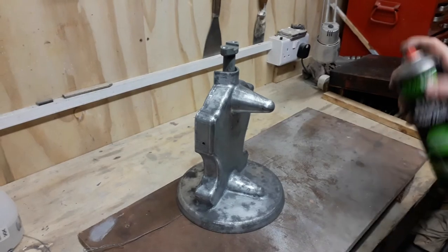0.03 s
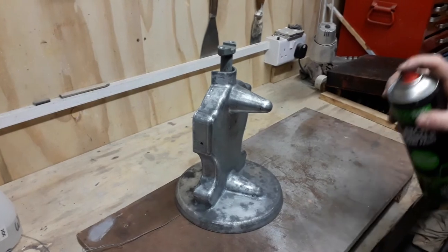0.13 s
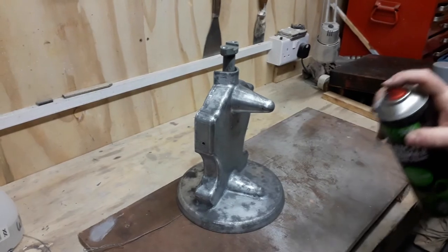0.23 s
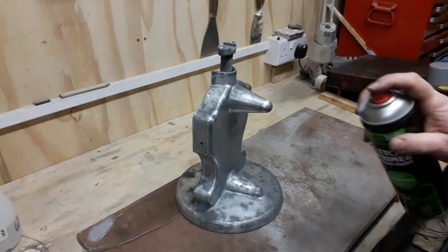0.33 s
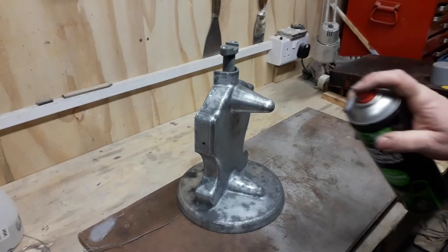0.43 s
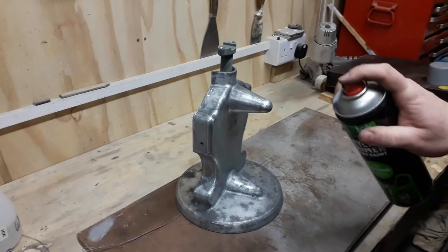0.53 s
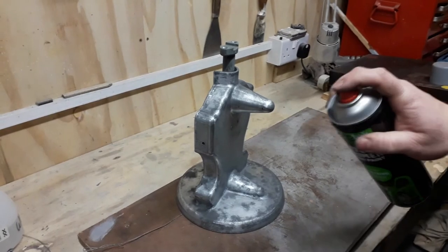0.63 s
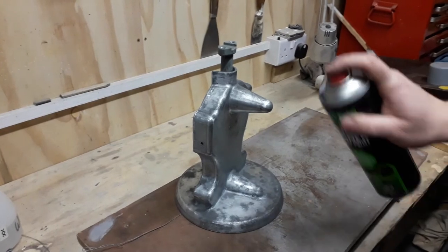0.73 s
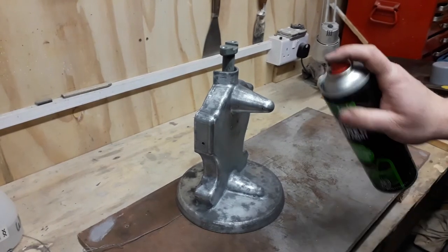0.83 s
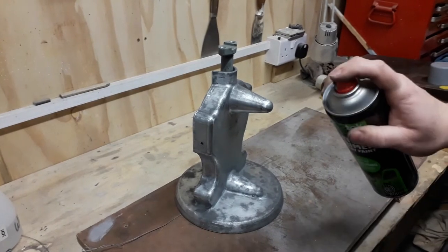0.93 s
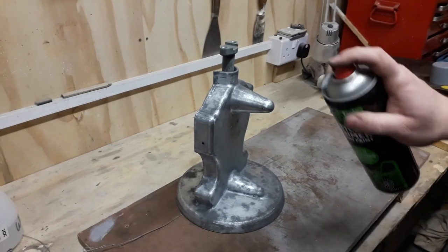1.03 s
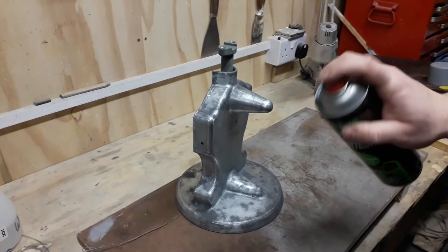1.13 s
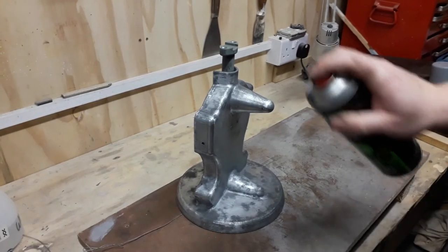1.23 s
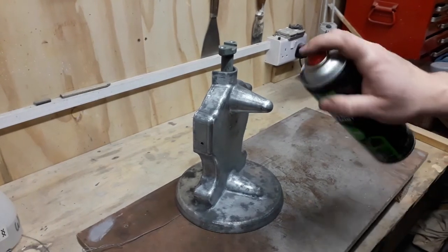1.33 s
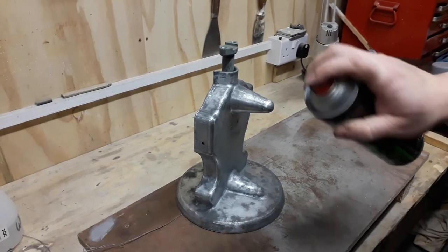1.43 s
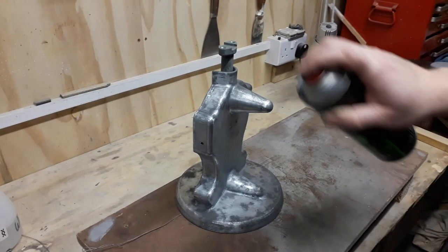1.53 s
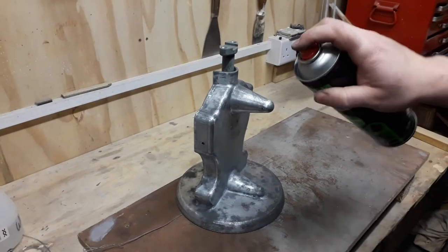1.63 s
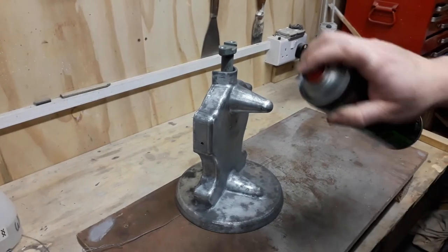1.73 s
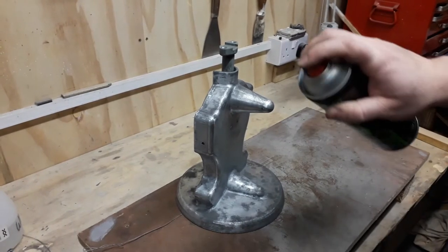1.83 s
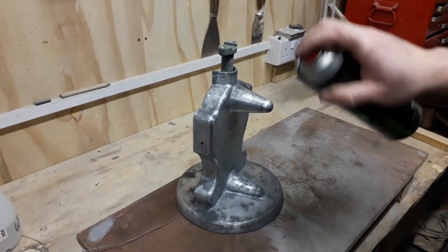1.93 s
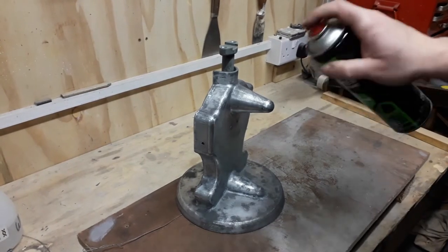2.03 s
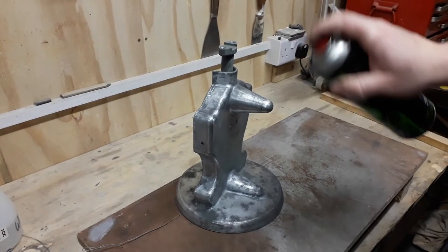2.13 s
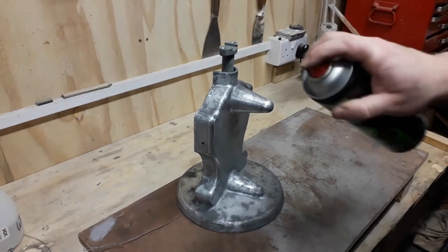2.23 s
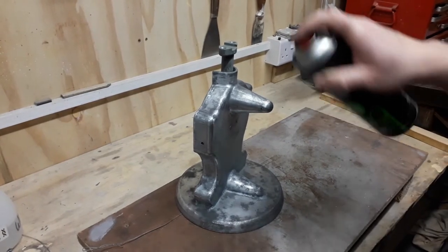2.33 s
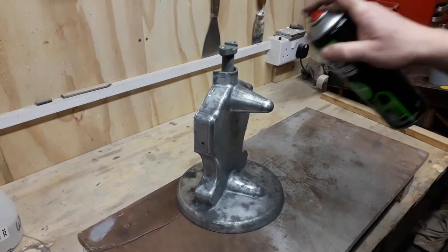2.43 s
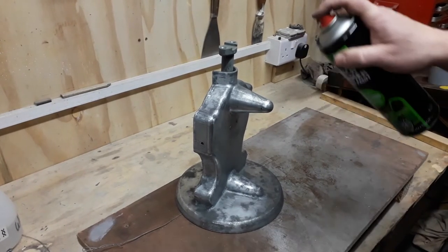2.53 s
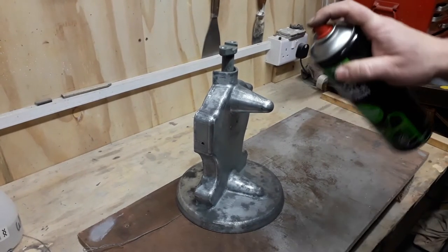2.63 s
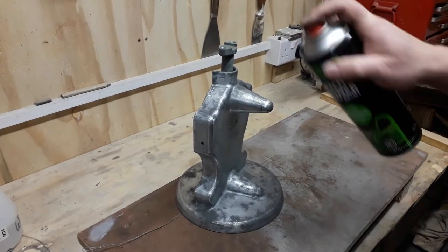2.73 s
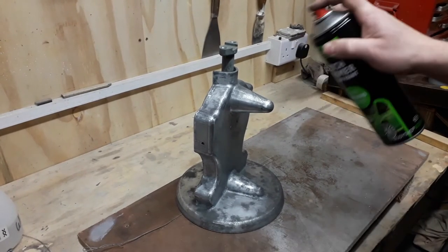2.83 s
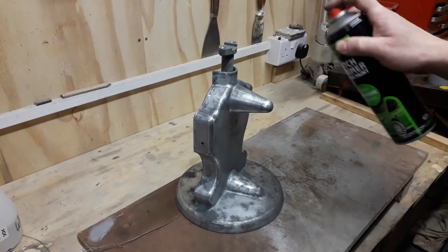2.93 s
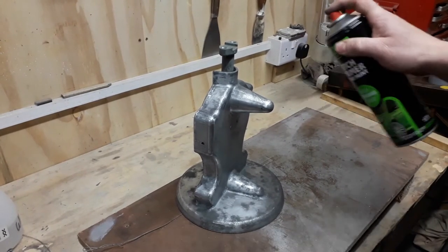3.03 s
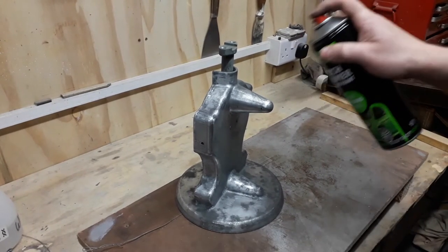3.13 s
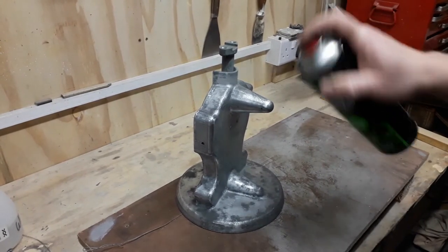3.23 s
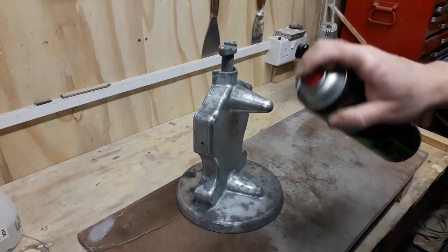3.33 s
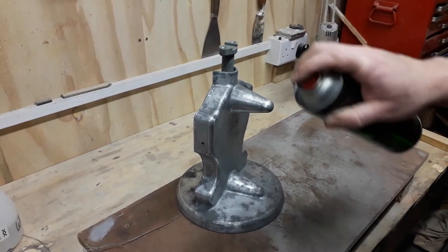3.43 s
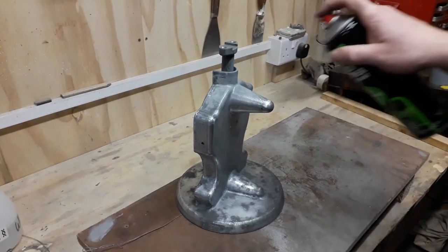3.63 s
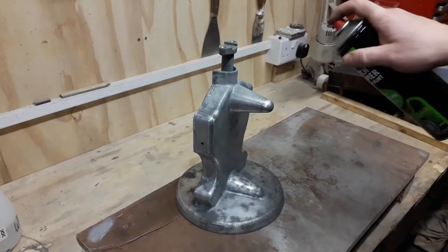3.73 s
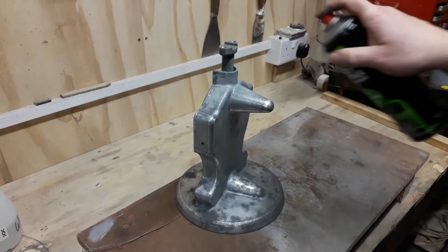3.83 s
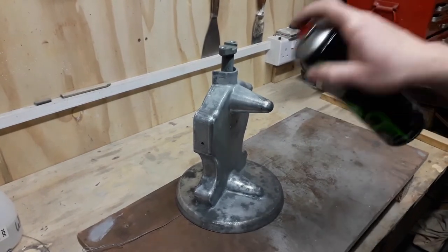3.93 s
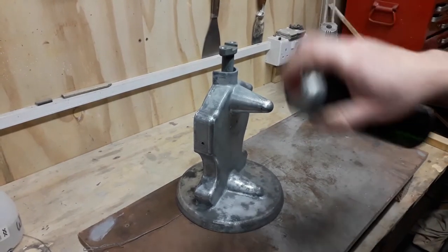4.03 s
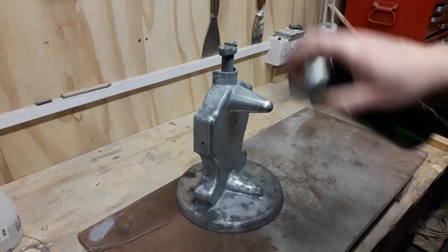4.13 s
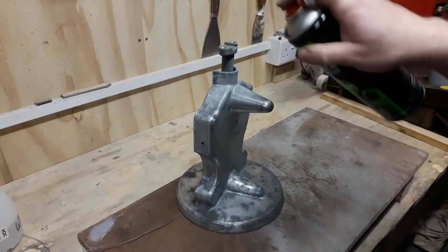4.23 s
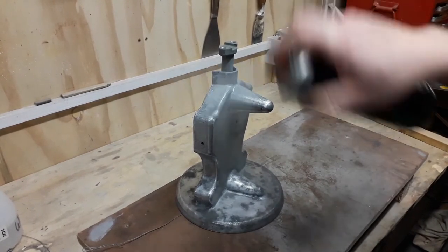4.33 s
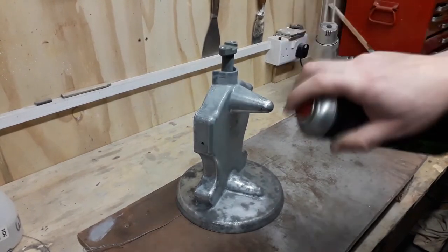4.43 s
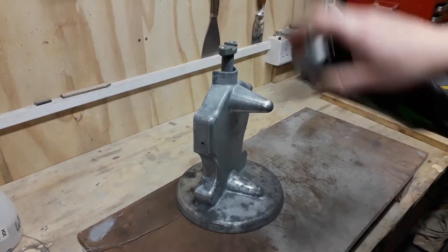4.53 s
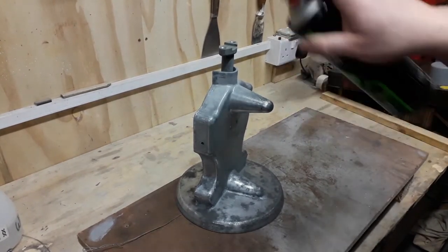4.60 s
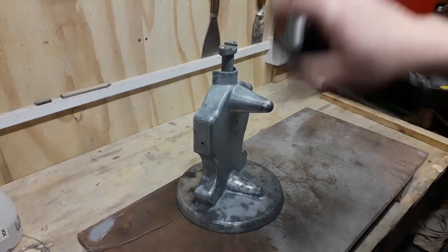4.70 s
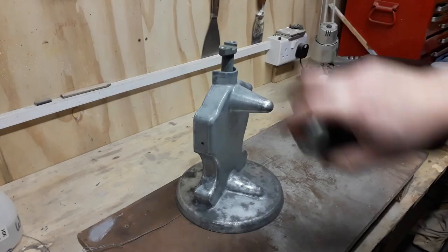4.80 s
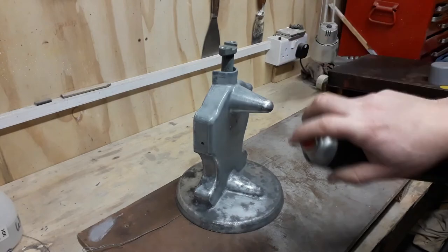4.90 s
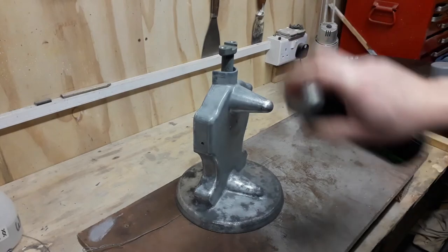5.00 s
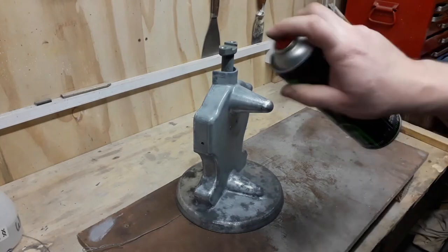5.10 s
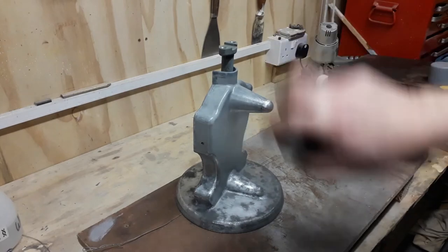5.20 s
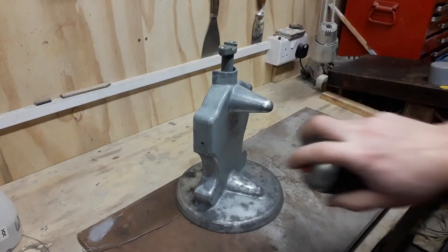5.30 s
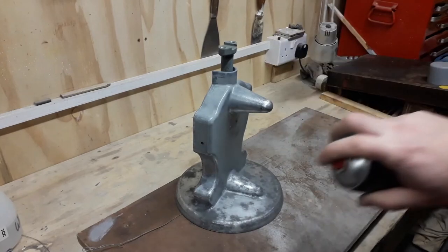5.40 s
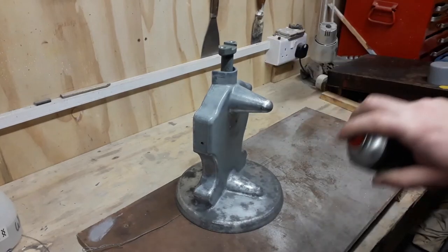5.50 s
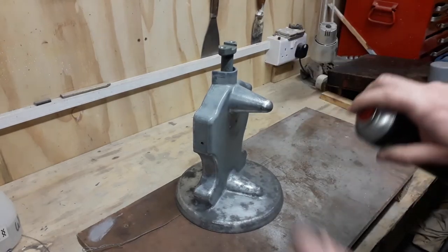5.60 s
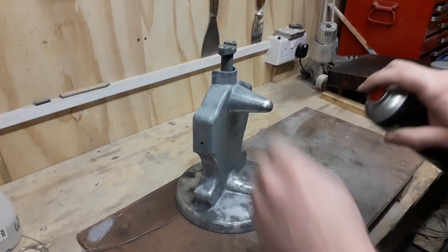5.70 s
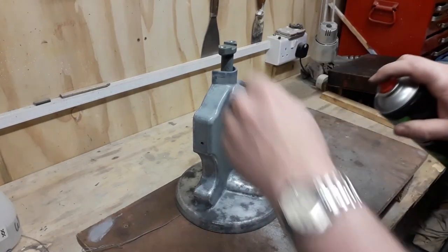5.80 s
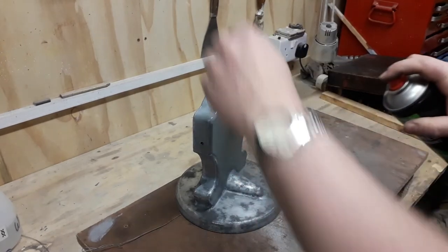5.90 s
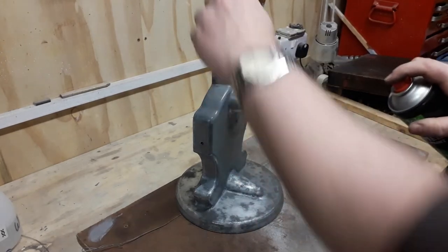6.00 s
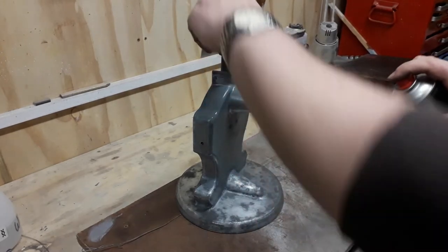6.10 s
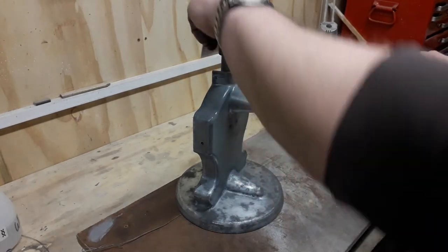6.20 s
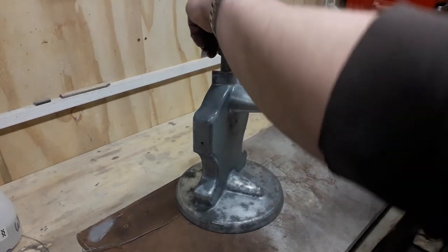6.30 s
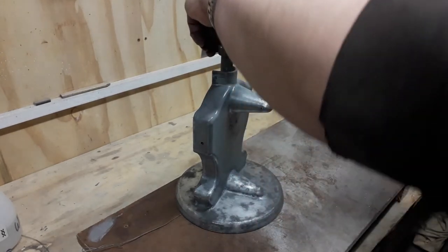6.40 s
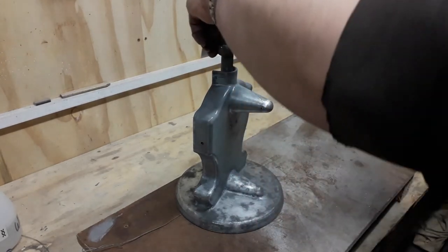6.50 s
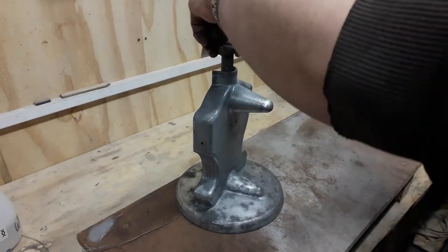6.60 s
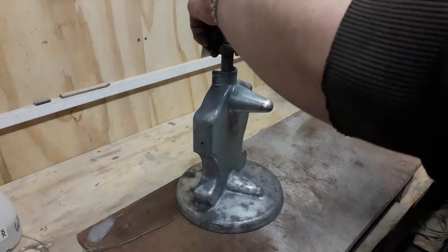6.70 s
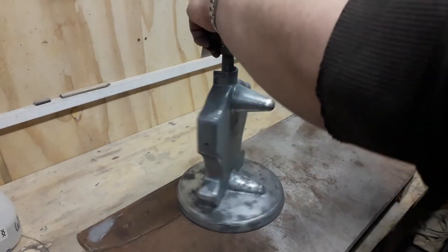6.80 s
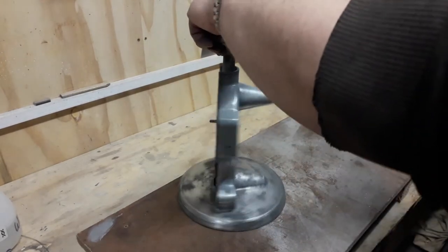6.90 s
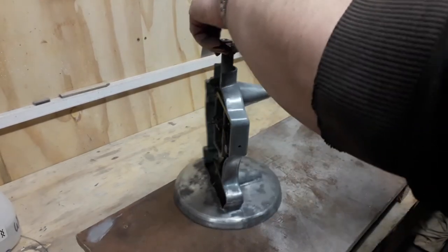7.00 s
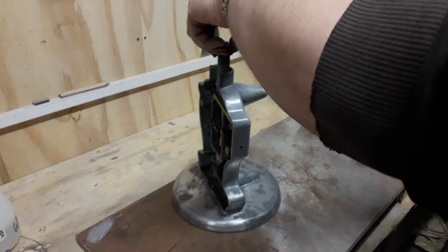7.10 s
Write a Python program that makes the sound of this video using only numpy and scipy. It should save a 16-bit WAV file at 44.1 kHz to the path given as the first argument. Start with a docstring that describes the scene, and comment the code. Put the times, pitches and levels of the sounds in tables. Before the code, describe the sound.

In a small wooden workshop, close to the microphone, a spray can is shaken with a few hard, bright ball clacks. After a near-quiet pause, eight short, crisp bursts of spray hiss out, with ball rattles between and after them, over a soft hiss and low rush. Finally a hand knocks a heavy iron casting and turns it with a gritty scrape on a steel plate.

```python
"""An aerosol can sprays a small iron casting on a workbench in eight short bursts: filtered noise for jet,
splash, gust. A hand taps the can; shaken before and around the bursts, its mixing ball strikes and rolls: noisy
contacts exciting wall and body resonances. A soft hiss and a low rush, both slowly varying noise, swell and dip
over a steady rumble. Then a hand knocks the casting and turns it, scraping, on its steel plate: noise and tiny
slips through iron modes. Small wooden room, close microphone."""
import sys
import numpy as np
from scipy import signal
from scipy.fft import rfft, irfft
from scipy.io import wavfile
from scipy.ndimage import map_coordinates

SR = 44100
rng = np.random.default_rng(int(sys.argv[2]) if len(sys.argv) > 2 else 0)


def store_wav(level_fs):
    """Save 16-bit WAV to argv[1]."""
    pcm = np.round(np.clip(np.atleast_2d(level_fs), -1, 1) * 32767)
    wavfile.write(sys.argv[1], SR, pcm.T.astype(np.int16))


N = 315315
T = np.arange(N) / SR
TAIL = T[:SR // 2]

# soft hiss and low rush: (time [s], hiss level [dB], rush level [dB])
AIR_LEVELS = [(0, -65.5, -76), (.28, -70.5, -65), (.72, -82, -95), (.95, -86.5, -82.5), (1.12, -69, -81),
              (1.5, -60.5, -72), (2.1, -58, -67), (2.65, -65, -63.5), (3.4, -61.5, -73), (3.75, -56.5, -63),
              (4.2, -49.5, -56.5), (4.65, -52, -61.5), (5.5, -56, -63.5), (5.85, -63, -73),
              (6.25, -67.5, -78.5), (6.65, -78.5, -66)]
# brief dips of hiss and rush: (time [s], depth [dB], half length [s])
AIR_DIPS = [(3.078, 21, 0.037), (3.466, 7, 0.025), (5.017, 17, 0.095)]
# colours of hiss, rush and room rumble: (frequency [Hz], gain [dB])
HISS_COLOUR = [(700, -20), (1400, -17.5), (2300, -12), (3500, -10), (4100, -1), (4600, 2), (5600, -4.5),
               (6900, -1), (8300, -19), (9500, -25), (12500, -16.5), (16000, -18.5)]
RUSH_COLOUR = [(60, -20), (150, -10.5), (280, -3.5), (410, -2), (650, -9), (1000, -13), (2000, -28)]
RUMBLE_COLOUR = [(20, -15.5), (45, -11), (75, -0.5), (110, -4), (200, -19), (600, -30.5), (3000, -33)]
RUMBLE_DB = -76

# ball strikes the can; the first row is a light tap of the hand on the can, sounded the same way: # (time [s],
# clack level [dB], hollow body re clack [dB], wall resonance nearest the spot [Hz])
BALL_BLOWS = [(0.0347, -39.5, -14.5, 3200), (0.0467, -37.5, -5, 4360), (0.1443, -45, 3, 4000),
              (0.1943, -17.5, -14, 4370), (0.3032, -31, -8.5, 4560), (0.335, -30, -8, 6000),
              (0.3838, -38.5, -2.5, 4470), (0.4557, -33, -8.5, 4940), (0.4994, -42.5, -11, 4500),
              (0.532, -38, -10.5, 4570), (0.5858, -41.5, -10.5, 5130), (1.865, -51.5, -14, 4300),
              (2.4639, -15, -19, 5340), (2.5419, -35.5, -19, 6800), (2.585, -44, -9, 3500),
              (2.6003, -28, -12.5, 7000), (2.611, -29.5, -9, 6150), (2.659, -40.5, -2, 4200),
              (2.8745, -21, -11, 4200), (2.9223, -39.5, 6, 4600), (2.9401, -30, -15, 4080),
              (2.9728, -26.5, -12, 4100), (3.0076, -33.5, -7.5, 4000), (3.8851, -38, -13.5, 4200),
              (4.127, -23, -6.5, 4260), (4.174, -31.5, -5, 6600), (4.234, -31, -11.5, 3840),
              (4.2737, -33.5, 1, 4100), (4.43, -39.5, 2.5, 4200), (4.8621, -24, -6, 5800),
              (4.891, -34.5, -8, 4070), (4.9164, -29, -9, 4200), (4.942, -33.5, -10, 4330),
              (5.297, -31, 1.5, 7000), (5.313, -17, -9, 4200), (5.3561, -35, -0.5, 6000),
              (5.3948, -38.5, 2.5, 4540), (5.4258, -46.5, 3.5, 3900), (5.5491, -26, -11, 5870),
              (5.595, -40, -2.5, 4100), (5.6348, -44.5, 0.5, 4430), (5.659, -49.5, 3, 6400),
              (5.6786, -35, -9, 4600), (5.7175, -43, -5.5, 4300)]
# modes of the can's wall: (frequency [Hz], level [dB], t60 [s])
CAN_MODES = [(1500, -14, .04), (2110, -1.5, 0.033), (2340, -9, 0.085), (4145, -9.5, 0.12), (4690, -11, .11),
             (4260, -3.5, .08), (5670, -19.5, .09), (5480, -16.5, 0.035), (6360, -2, 0.048),
             (6980, -17.5, .07)]
# colours of the ball's contact, hollow body and hard tick: (frequency [Hz], gain [dB])
CLACK_COLOUR = [(1800, -19.5), (3000, -10), (4100, 4), (5200, -1), (6300, 1), (7300, -6), (8200, -22),
                (11000, -40)]
HOLLOW_COLOUR = [(400, -14), (1000, -7), (1600, 1.5), (2300, 3), (3000, -6.5), (4500, -34), (9000, -49.5)]
TICK_COLOUR = [(5000, -30), (8000, -9), (11000, 1.5), (16000, -6.5)]
# after-ring and tick re clack; a blow that shakes the body gives more of both [dB per dB of body]
RING_DB, RING_DB_PER_BODY_DB = -9, 0.12
TICK_DB, TICK_DB_PER_BODY_DB = -16, 0.3
# ball rolls along the wall:
# (time [s], rub level [dB], hollow body level [dB], wall resonance [Hz], half length [s])
BALL_ROLLS = [(0.15, -57, -66, 3230, .07), (0.85, -81, -92, 3300, .04), (2.653, -57, -61, 3400, .08),
              (3.41, -74, -63, 3500, .05), (5.5, -55, -56, 4300, .07), (5.85, -76, -70, 4300, .12)]

# nozzle presses: (time [s], held [s], valve opening time constant [s], jet level [dB], splash level [dB],
# gust level [dB], time the jet is square on the casting [s], dwell there [s])
NOZZLE_PRESSES = [(1.897, 0.13, 0.013, -30, -46.5, -39, 2.012, .024),
                  (2.258, 0.16, .006, -30.5, -45, -42.5, 2.383, 0.019),
                  (2.7, 0.15, 0.0072, -30, -42.5, -44.5, 2.83, 0.023),
                  (3.106, 0.16, 0.037, -24, -35, -44, 3.232, 0.059),
                  (3.502, 0.14, 0.0098, -25.5, -41, -49.5, 3.58, 0.12),
                  (4.269, .122, 0.011, -26, -35, -49.5, 4.32, 0.037),
                  (4.702, 0.096, 0.0086, -26.5, -34.5, -49, 4.765, 0.059),
                  (5.147, 0.11, 0.015, -26, -37.5, -47.5, 5.19, 0.022)]
# colours of jet, splash and gust: (frequency [Hz], gain [dB])
JET_COLOUR = [(1500, -36), (2400, -7.5), (3000, -11.5), (3900, -6), (4900, -6), (6200, -0.5), (7300, 1),
              (8400, -11.5), (9500, -13.5), (11000, -5), (13000, -3), (14200, -5), (16000, -6.5)]
SPLASH_COLOUR = [(400, -22.5), (900, -13), (1400, -5), (2000, -3), (2450, -1), (3000, -7.5), (4500, -0.5),
                 (7000, -25.5)]
GUST_COLOUR = [(50, -30.5), (120, -13), (220, -2), (330, -4), (550, -2), (800, -13), (1300, -18),
               (5000, -48.5)]
JET_SHUT_S, SPLASH_SHUT_S = 0.012, 0.016  # time constants once the valve is let go
SWEEP_DB = 2.5  # jet loss at the ends of a sweep re its middle
GUST_SPILL = 0.11  # share of the gust left while the jet points past the casting
SPLASH_AIM_DWELLS = 2.9  # dwells either side of the square hit where the splash is 3 dB down

# casting knocks on the plate: (time [s], thud level [dB], clink level [dB], clink pitch [Hz])
PLATE_KNOCKS = [(6.288, -35, -39, 3170), (6.528, -45, -50.5, 480), (6.635, -55.5, -71, 2840),
                (6.716, -29.5, -38.5, 1200), (6.742, -38, -67, 700), (6.878, -41.5, -54, 1890),
                (6.926, -29.5, -31.5, 2480), (6.977, -35.5, -38, 2165), (7.012, -41.5, -34, 5950),
                (7.038, -53, -38, 4900), (7.085, -34.5, -53, 1480)]
# modes of casting and plate together: (frequency [Hz], width [Hz], gain [dB])
IRON_MODES = [(111, 33, 1), (158, 25, 1), (212, 28, 10), (399, 29, 6), (444, 19, -3), (507.5, 14, -1),
              (580, 14, 2.5), (645.4, 19, 11.5), (794, 32, 0), (906, 14, 2), (962, 16, 4.5),
              (1467, 40, 2.5), (1535, 30, 3), (2192, 29, 6), (2500, 42, 2), (3110, 70, 6), (3840, 55, 8),
              (4200, 30, 12.5), (5080, 50, 8.5), (5666, 65, 12.5), (6440, 45, 8.5), (7540, 32, 0)]
# colours of plate thud, bench boom, knock clink and gritty scrape: (frequency [Hz], gain [dB])
THUD_COLOUR = [(330, -7.5), (430, 1), (650, -3), (950, -4), (1500, -20), (2500, -53), (8000, -81)]
BOOM_COLOUR = [(55, -6), (110, -2.5), (170, -2.5), (230, -5.5), (310, -6), (600, -23.5), (3000, -52)]
CLINK_COLOUR = [(900, -0.5), (1500, 2.5), (3100, 1.5), (4500, -5.5), (7400, -3), (8800, -21.5),
                (16000, -20)]
GRIT_COLOUR = [(700, -13), (1500, 4.5), (2400, 0), (3200, -2.5), (4800, -1.5), (6300, -5), (7600, -5.5),
               (9000, -23), (11500, -14), (16000, -23)]

# casting is turned: (time [s], effort as grinding level [dB])
TURN_EFFORT = [(6.775, -49.5), (6.83, -42.5), (6.87, -43.5), (6.93, -35.5), (6.995, -33.5), (7.04, -43.5),
               (7.105, -39), (7.15, -51)]
# iron squeals: (time [s], mean pitch [Hz], median level [dB], half length [s])
IRON_SQUEALS = [(6.832, 7540, -44, .022), (6.822, 5800, -47, .027), (7.115, 5820, -47, .015)]
GRIT_DB = 0.5  # gritty treble re grinding
SLIPS_PER_S, CRACKS_PER_S = 1600, 90  # of the base on the plate, and of grit under it
STICK_DB, STICK_PER_S = 0.5, 90  # unevenness of sticking and letting go

TOP_HZ = 15850


def undb(db):
    """Decibels to gain."""
    return 10 ** (np.asarray(db) / 20)


def unit(x, span_s=None):
    """Scale to rms 1, over the whole sound or its first span_s."""
    end = int(span_s * SR) if span_s else None
    return x / np.sqrt(np.mean(x[:end] ** 2) + 1e-20)


def colour(x, points, size=4096):
    """Minimum-phase filter through (Hz, dB) points; 12 dB/octave down below the first, to at most 40 dB."""
    hz, db = np.transpose(points)
    freqs_hz = np.maximum(np.fft.rfftfreq(size, 1 / SR), 1)
    low_cut = np.clip(freqs_hz / hz[0], 0.1, 1) ** 2
    gain = undb(np.interp(np.log(freqs_hz), np.log(hz), db)) * low_cut
    # folding the cepstrum makes the response causal
    cepstrum = irfft(np.log(gain))
    cepstrum[1:size // 2] *= 2
    cepstrum[size // 2 + 1:] = 0
    impulse = irfft(np.exp(rfft(cepstrum)))
    return signal.fftconvolve(x, impulse)[:len(x)]


def noise(points):
    """Coloured noise of rms 1."""
    return unit(colour(rng.standard_normal(N), points))


def tail_noise():
    """White noise as long as TAIL."""
    return rng.standard_normal(len(TAIL))


def fade(t60_s):
    """Exponential decay, 60 dB in t60_s."""
    return np.exp(-np.log(1000) * TAIL / t60_s)


def onset(rise_s):
    """Exponential approach to 1."""
    return 1 - np.exp(-TAIL / rise_s)


def swell(s, half_length_s):
    """Bell-shaped rise and fall around time s."""
    return np.exp(-((T - s) / half_length_s) ** 2)


def walk(rate_hz):
    """Random wander: straight lines between normal draws at rate_hz."""
    knots_s = np.arange(0, N / SR + 1, 1 / rate_hz)
    return np.interp(T, knots_s, rng.standard_normal(len(knots_s)))


def gains(rows, rise_s=0.002, fall_s=0.024):
    """Columns of dB as gain curves that die away outside their span."""
    s, *columns = np.transpose(rows)
    before_s = np.maximum(s[0] - T, 0)
    after_s = np.maximum(T - s[-1], 0)
    gate = np.exp(-before_s / rise_s - after_s / fall_s)
    return [gate * undb(np.interp(T, s, column)) for column in columns]


def resonate(x, hz, q):
    """One resonance, gain 1 at its centre."""
    return signal.lfilter(*signal.iirpeak(hz, q, fs=SR), x)


def add(track, s, sound):
    """Mix a sound into the track at time s."""
    start = int(s * SR)
    track[start:start + len(sound)] += sound[:N - start]


def air():
    """A soft hiss and a low rush swell and dip as shaped noise over the room's steady rumble."""
    hiss_gain, rush_gain = gains(AIR_LEVELS, rise_s=0.2, fall_s=0.23)
    dips = undb(-sum(depth_db * swell(s, half_s) for s, depth_db, half_s in AIR_DIPS))
    hiss = hiss_gain * noise(HISS_COLOUR) * undb(0.65 * walk(25))
    rush = rush_gain * noise(RUSH_COLOUR)
    return dips * (hiss + rush) + undb(RUMBLE_DB) * noise(RUMBLE_COLOUR)


def ring(modes, scatter_db):
    """Decaying sines of one blow; each blow weights the modes anew."""
    out = np.zeros(len(TAIL))
    for hz, db, t60_s in modes:
        level = undb(db + scatter_db * rng.standard_normal())
        out += level * fade(t60_s) * np.sin(2 * np.pi * (hz * TAIL + rng.random()))
    return out


def ball():
    """A hard clack on the wall, a hollow knock of the body, then the can rings on, damped by its paint."""
    out = np.zeros(N)
    first_s = 0.0025
    for s, clack_db, body_db, wall_hz in BALL_BLOWS:
        contact = (TAIL == 0) + 0.14 * tail_noise() * fade(0.005)
        # many close wall modes and the nearest surfaces blur into a short noisy ring
        blur = tail_noise() * (fade(0.077) + 0.14 * fade(0.26)) * onset(0.0013)
        clack = unit(colour(contact + 1.2 * resonate(contact, wall_hz, q=5), CLACK_COLOUR), first_s)
        noisy_ring = unit(colour(blur + 1.2 * resonate(blur, wall_hz, q=9), CLACK_COLOUR), 0.09)
        modal_ring = unit(ring(CAN_MODES, scatter_db=4.5), 0.0075)
        after = 0.38 * noisy_ring + 0.74 * modal_ring
        body = unit(colour(contact + 0.059 * blur, HOLLOW_COLOUR), first_s)
        tick = unit(colour(contact + 0.058 * blur, TICK_COLOUR), first_s)
        blow = clack + undb(body_db) * body
        blow += undb(RING_DB + RING_DB_PER_BODY_DB * body_db) * after
        blow += undb(TICK_DB + TICK_DB_PER_BODY_DB * body_db) * tick
        add(out, s, undb(clack_db) * blow)
    return out


def rolling():
    """The rolling ball rubs the wall through the paint, unevenly, and the hollow body murmurs with it."""
    out = np.zeros(N)
    rub, body = noise(CLACK_COLOUR), noise(HOLLOW_COLOUR)
    for s, rub_db, body_db, wall_hz, half_s in BALL_ROLLS:
        wall_rub = unit(rub + 3 * resonate(rub, wall_hz, q=11))
        out += swell(s, half_s) * (undb(rub_db) * wall_rub + undb(body_db) * body)
    return out * undb(2 * walk(100))


def presses():
    """Gains of jet, splash, gust: the valve opens, holds and shuts as the hand sweeps the jet over the casting."""
    jet, splash, gust = np.zeros((3, N))
    for s, held_s, opening_s, jet_db, splash_db, gust_db, square_s, dwell_s in NOZZLE_PRESSES:
        valve = 1 - np.exp(-np.maximum(T - s, 0) / opening_s)
        impact = valve ** 3  # only a full jet reaches the casting
        since_s = np.maximum(T - s - held_s, 0)
        jet_shut = np.exp(-since_s / JET_SHUT_S)
        splash_shut = np.exp(-since_s / SPLASH_SHUT_S)
        off_middle = np.clip(2 * (T - s) / held_s - 1, -1, 1)
        splash_aim = 1 / np.hypot(1, (T - square_s) / (SPLASH_AIM_DWELLS * dwell_s))
        gust_aim = GUST_SPILL + (1 - GUST_SPILL) * swell(square_s, dwell_s)
        jet += undb(jet_db - SWEEP_DB * off_middle ** 2) * valve * jet_shut
        splash += undb(splash_db) * impact * splash_shut * splash_aim
        gust += undb(gust_db) * impact * jet_shut * gust_aim
    return jet, splash, gust


def spray():
    """The jet hisses and flutters with its droplets, splashes on the casting and buffets it when aimed square."""
    jet, splash, gust = presses()
    hiss = jet * noise(JET_COLOUR) * undb(0.3 * walk(500))
    hiss += splash * noise(SPLASH_COLOUR) * undb(1.2 * walk(200))
    # the bench mirrors the hiss; the path changes as the hand sweeps
    lag_s = 0.0013 + 0.00025 * walk(6.4)
    mirrored = map_coordinates(hiss, [(T - lag_s) * SR], order=3)
    buffeting = gust * noise(GUST_COLOUR) * undb(0.82 * walk(90))
    return 0.88 * hiss + 0.34 * mirrored + buffeting


def iron(push):
    """The push itself plus the resonances of casting and plate."""
    out = push
    for hz, width_hz, db in IRON_MODES:
        out = out + undb(db) * resonate(push, hz, q=hz / max(width_hz, 16))
    return out


def knocks():
    """Each knock chatters on the plate, its clink pitched by the spot; the heavy bench follows late."""
    out = np.zeros(N)
    for s, thud_db, clink_db, clink_hz in PLATE_KNOCKS:
        chatter = iron(tail_noise() * fade(0.14) * onset(0.0025))
        clink = colour(chatter, CLINK_COLOUR)
        clink = clink + 4.6 * resonate(clink, clink_hz, q=13.5)
        boom = colour(iron(tail_noise() * fade(0.072) * TAIL ** 2), BOOM_COLOUR)
        low = unit(colour(chatter, THUD_COLOUR), 0.015) + undb(-7) * unit(boom, 0.039)
        add(out, s, undb(thud_db) * low + undb(clink_db) * unit(clink, 0.0091))
    return out


def turning():
    """The rough base drags in tiny slips, louder with effort; grit cracks under it and the iron squeals."""
    grind, = gains(TURN_EFFORT, rise_s=0.0064)
    slips = (rng.random(N) < SLIPS_PER_S / SR) * rng.standard_normal(N)
    slips *= undb(STICK_DB * walk(STICK_PER_S))
    cracks = 1.0 * (rng.random(N) < CRACKS_PER_S / SR)
    drag = iron(slips)
    thud = unit(colour(drag, THUD_COLOUR))
    boom = unit(colour(drag, BOOM_COLOUR))
    grit = unit(colour(iron(slips + cracks), GRIT_COLOUR))
    out = grind * (thud + undb(-4.5) * boom + undb(GRIT_DB) * grit)
    for s, hz, db, half_s in IRON_SQUEALS:
        pitch_hz = hz * (1 + 0.009 * walk(250))
        level = undb(db + 4 * walk(150)) * swell(s, half_s)
        out += level * np.sin(2 * np.pi * np.cumsum(pitch_hz) / SR)
    return out


def room(x, wet_db, t60_s):
    """Short diffuse echo of the wooden walls, dull at the top: convolution with decaying noise."""
    tail = tail_noise() * fade(t60_s) * onset(0.008)
    tail = colour(tail, [(100, 7.5), (4000, -2), (8000, -14.5), (16000, -5.5)])  # (Hz, dB)
    return x + undb(wet_db) * signal.fftconvolve(x, tail / np.linalg.norm(tail))[:N]


def scene():
    """Can, spray and casting in the room, plus the air, which gets no echo."""
    sources = ball() + rolling() + spray() + knocks() + turning()
    return (room(sources, wet_db=-17.5, t60_s=0.19) + air())[None]


def record(dry):
    """Steep elliptic low-pass: 0.2 dB ripple up to TOP_HZ, 70 dB down beyond."""
    low_pass = signal.ellip(10, 0.2, 70, TOP_HZ, fs=SR, output="sos")
    return signal.sosfilt(low_pass, dry)


dry = scene()
out = record(dry)
store_wav(out)
```